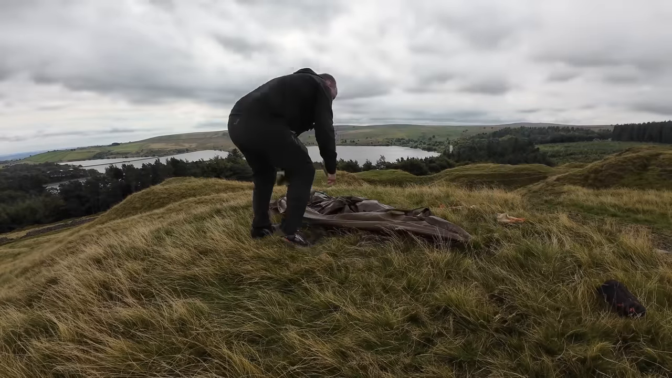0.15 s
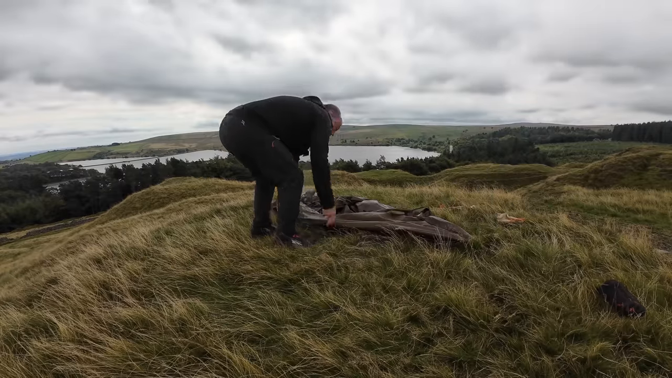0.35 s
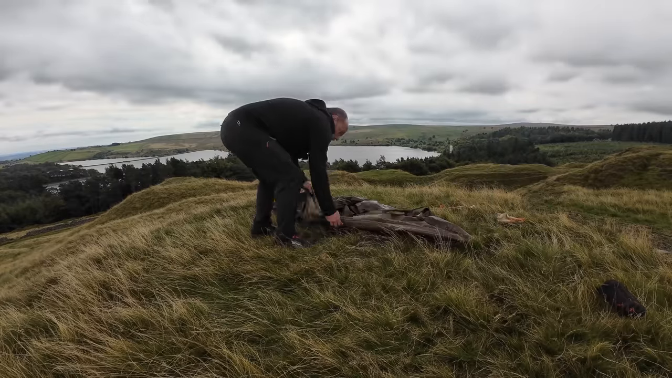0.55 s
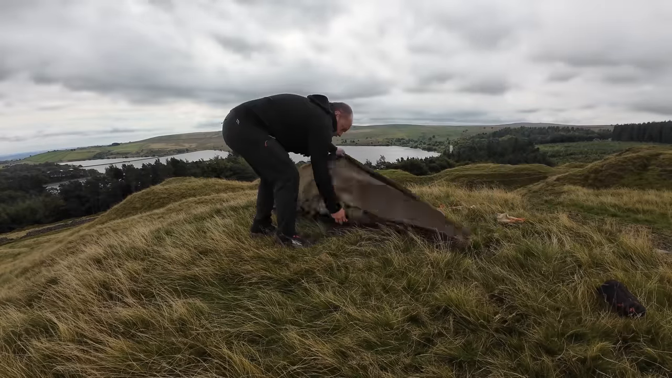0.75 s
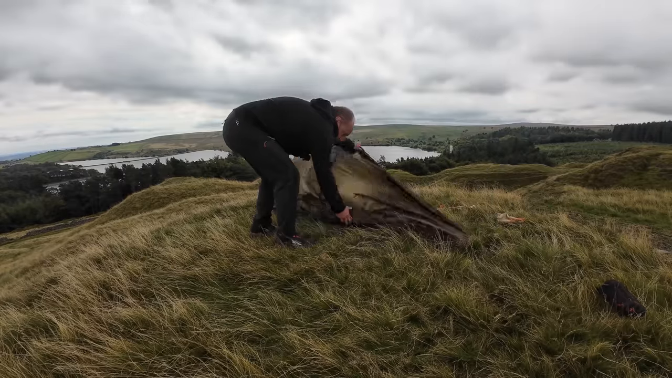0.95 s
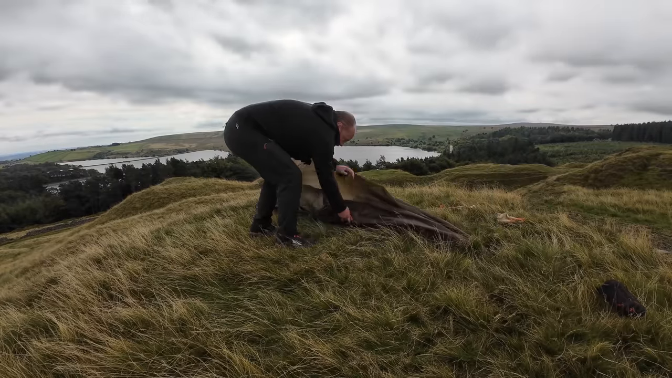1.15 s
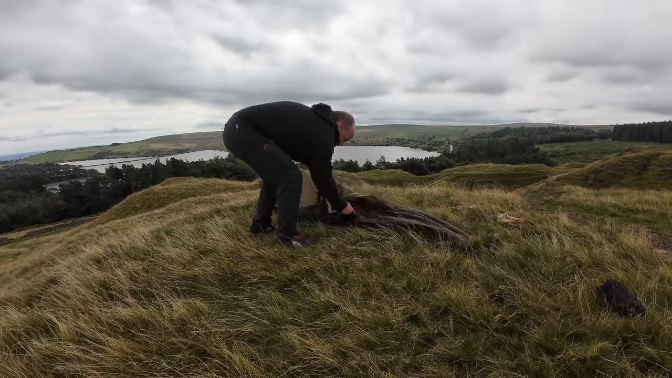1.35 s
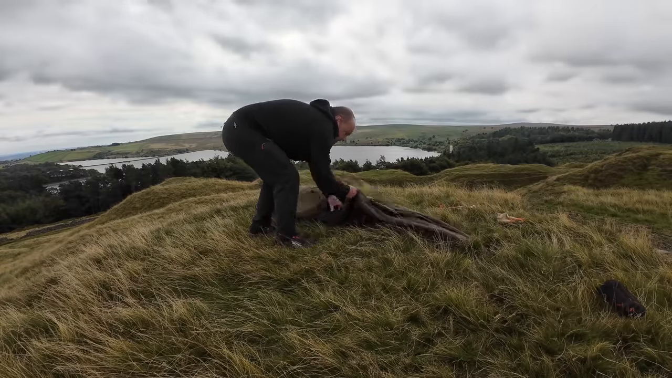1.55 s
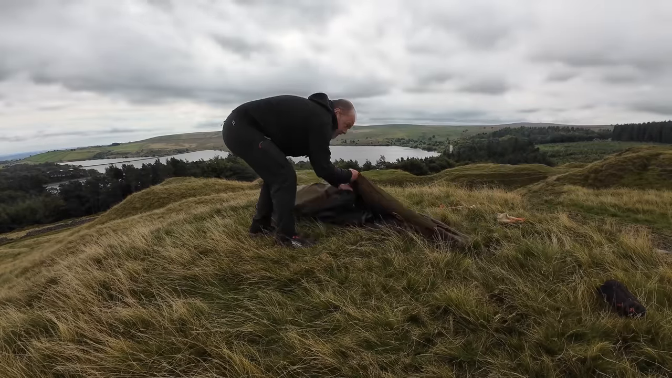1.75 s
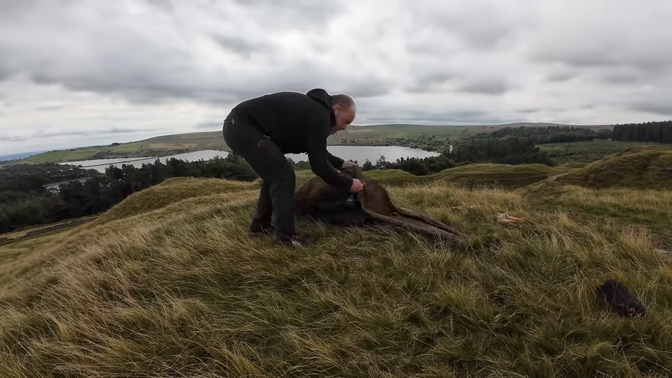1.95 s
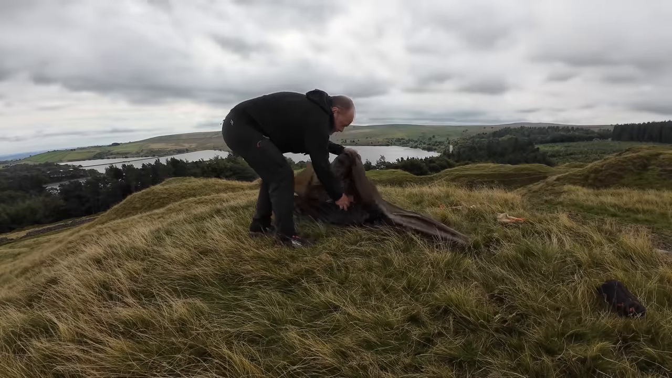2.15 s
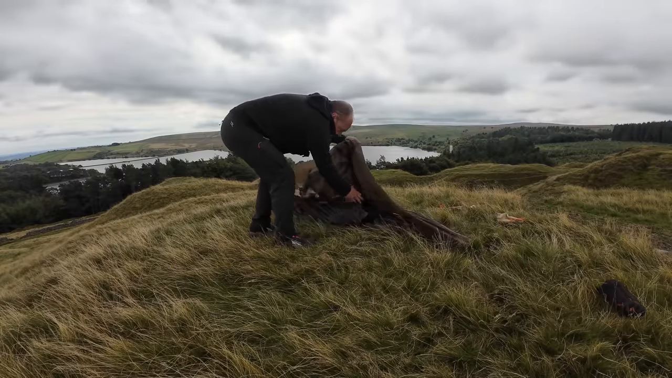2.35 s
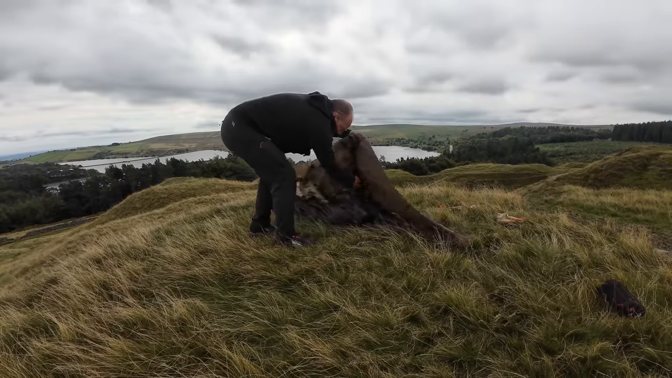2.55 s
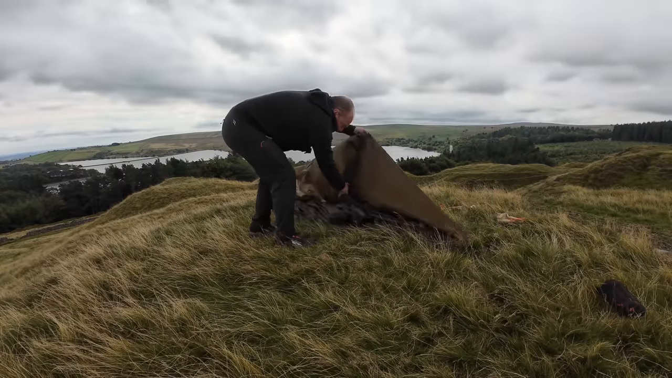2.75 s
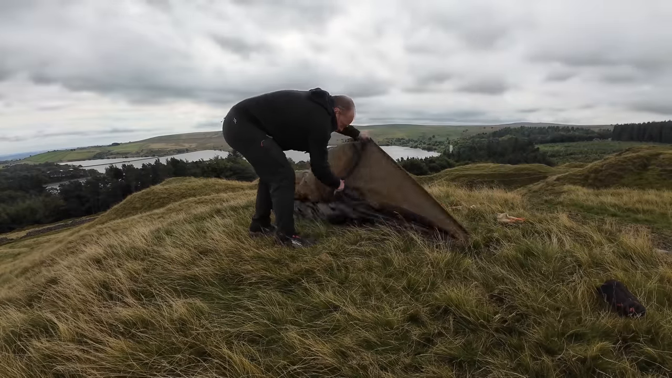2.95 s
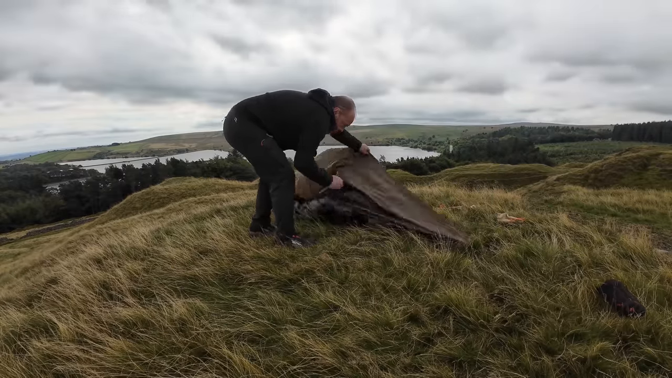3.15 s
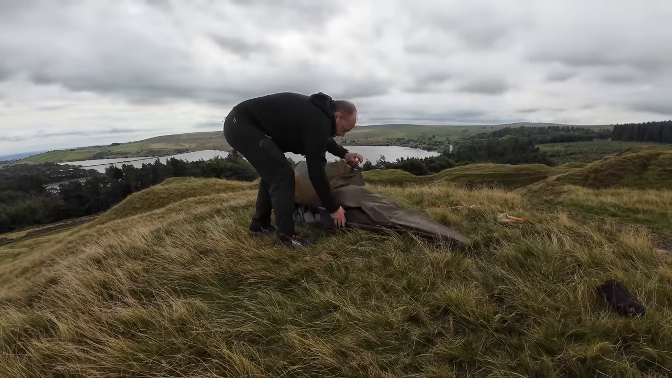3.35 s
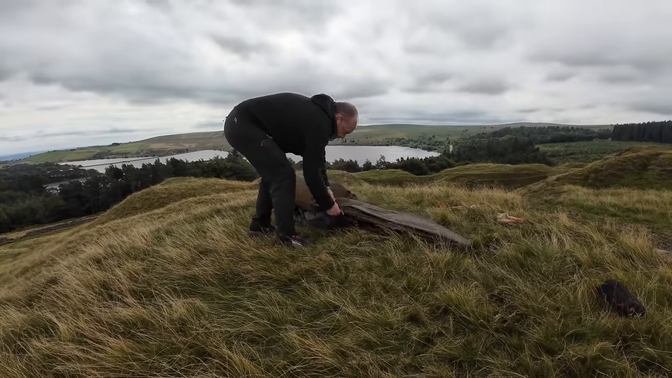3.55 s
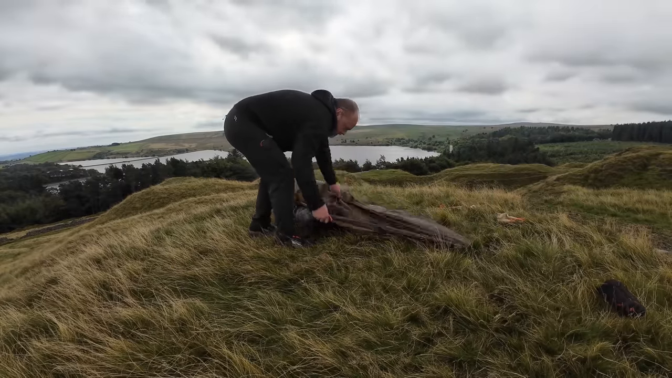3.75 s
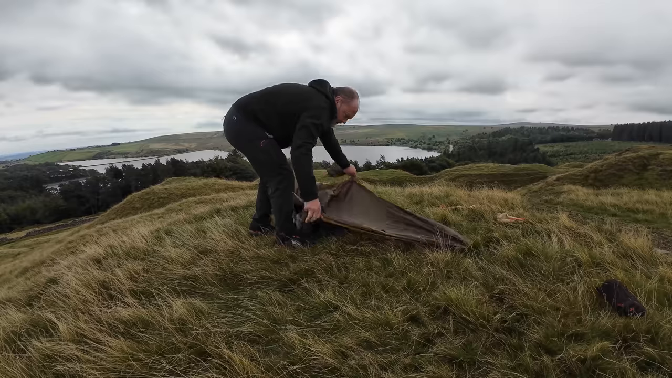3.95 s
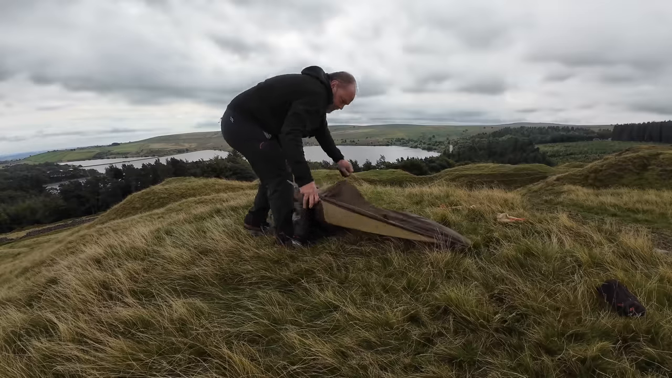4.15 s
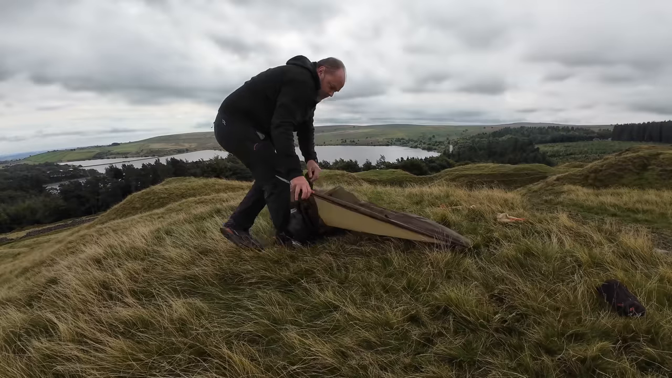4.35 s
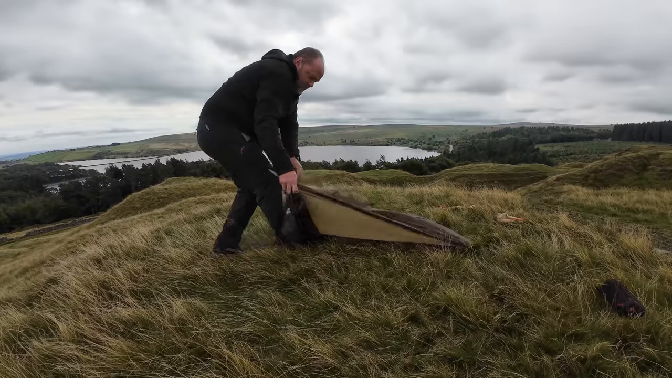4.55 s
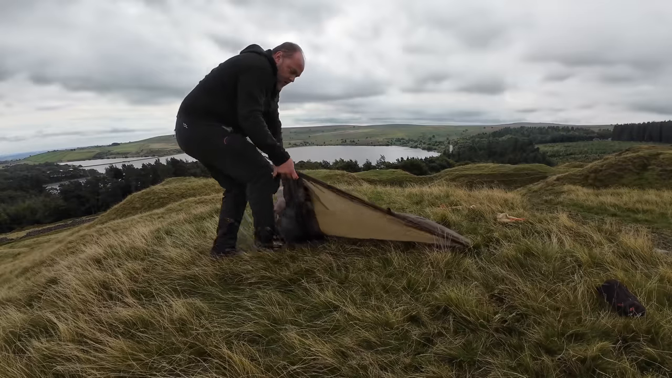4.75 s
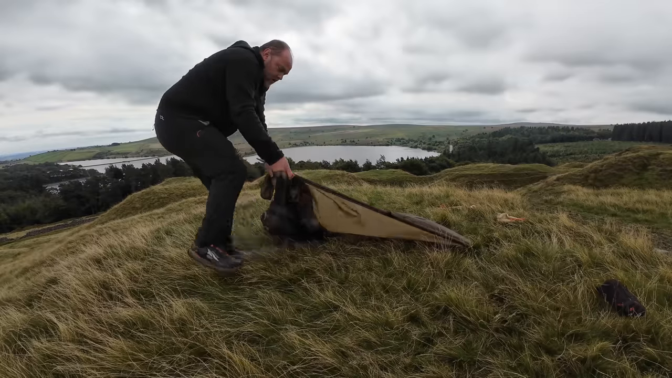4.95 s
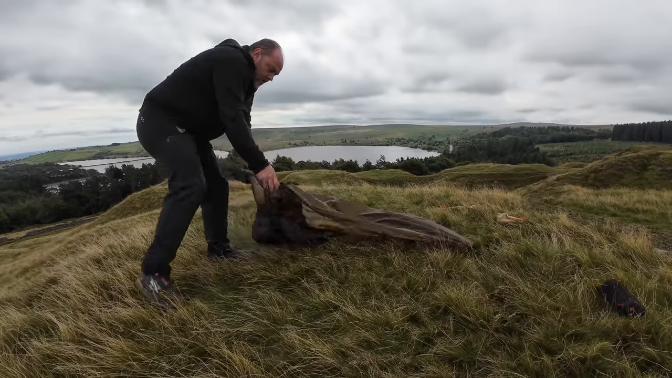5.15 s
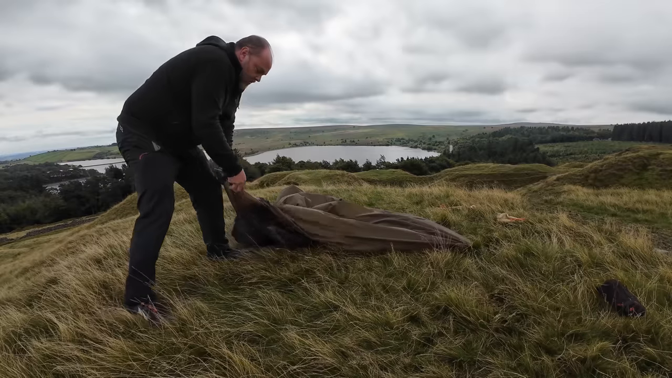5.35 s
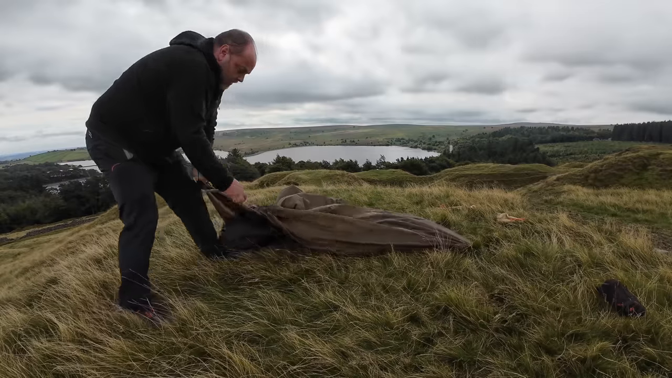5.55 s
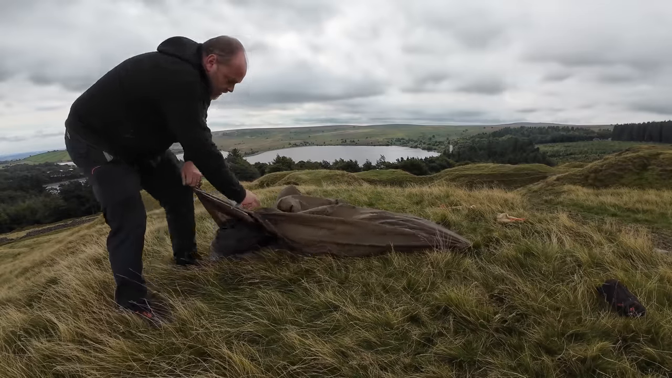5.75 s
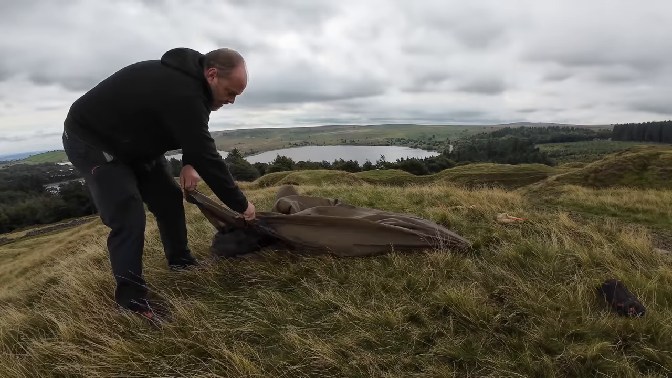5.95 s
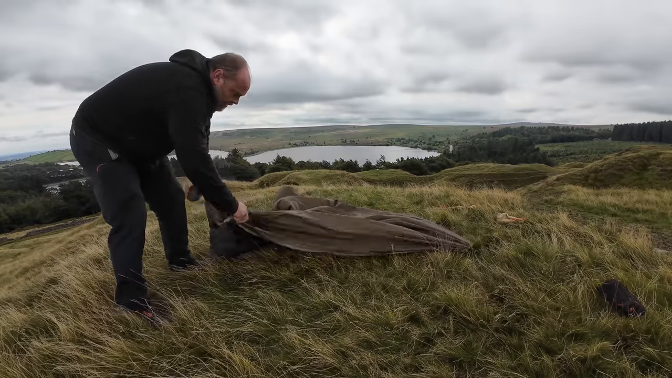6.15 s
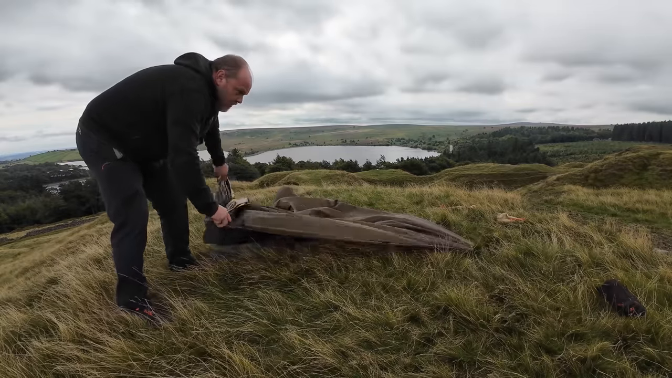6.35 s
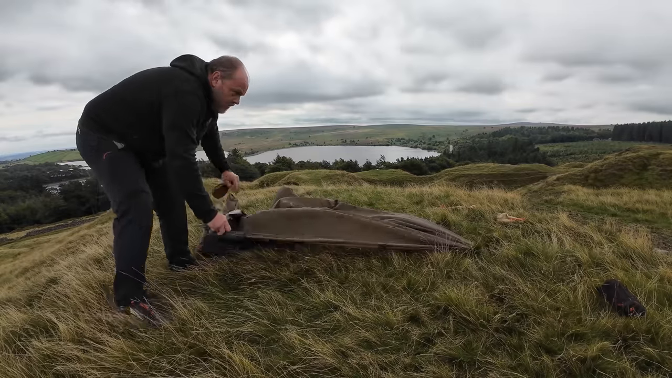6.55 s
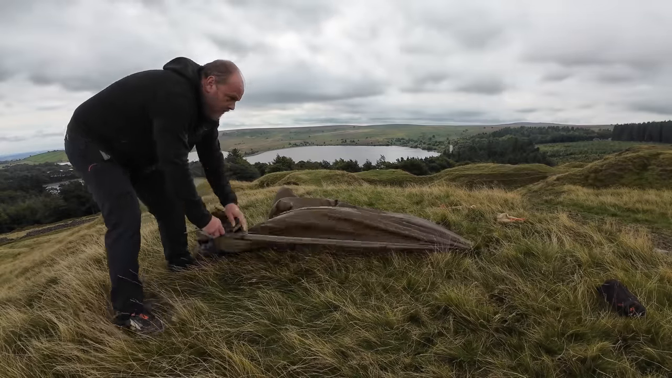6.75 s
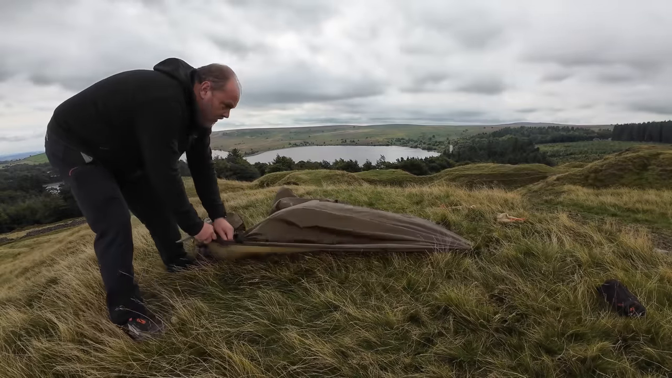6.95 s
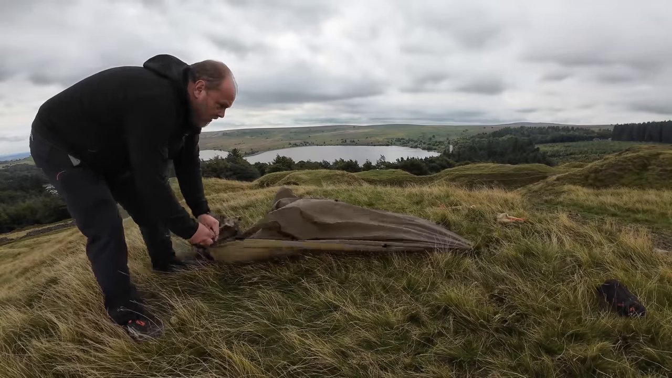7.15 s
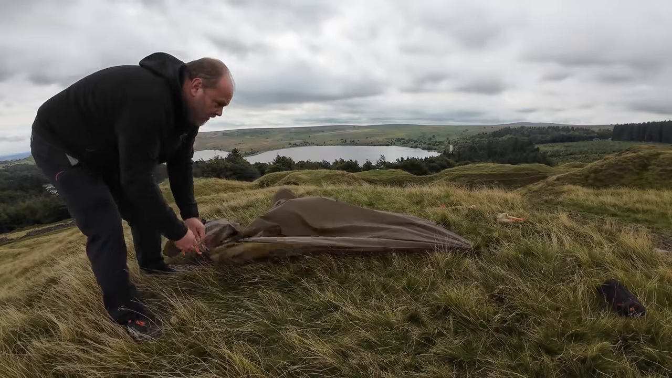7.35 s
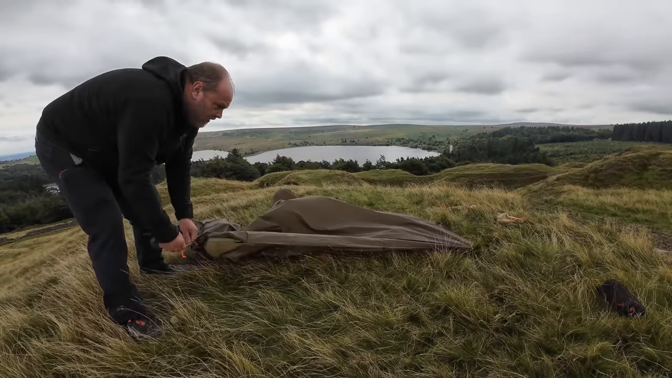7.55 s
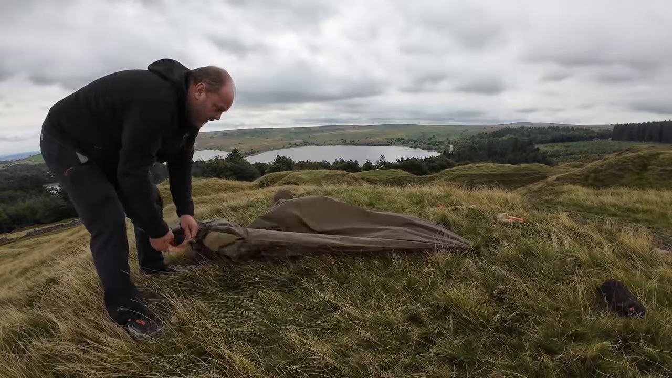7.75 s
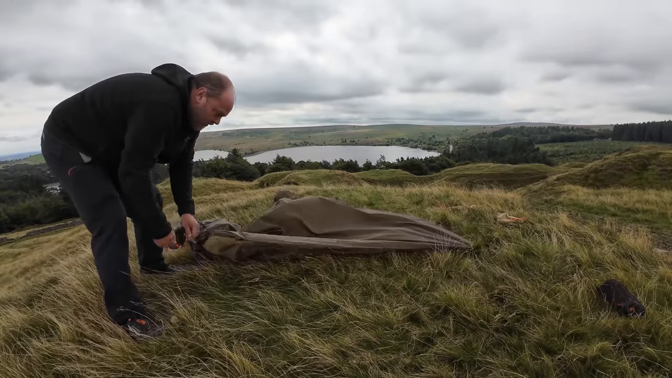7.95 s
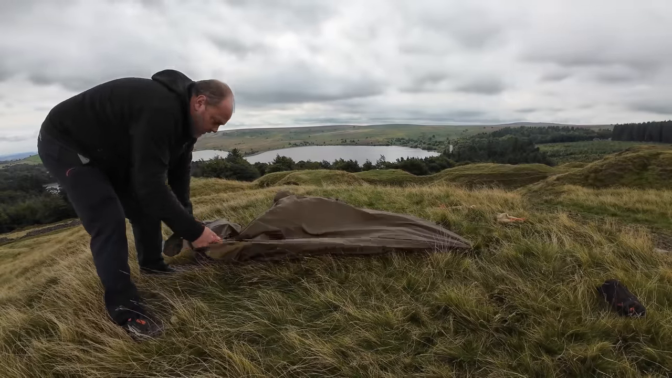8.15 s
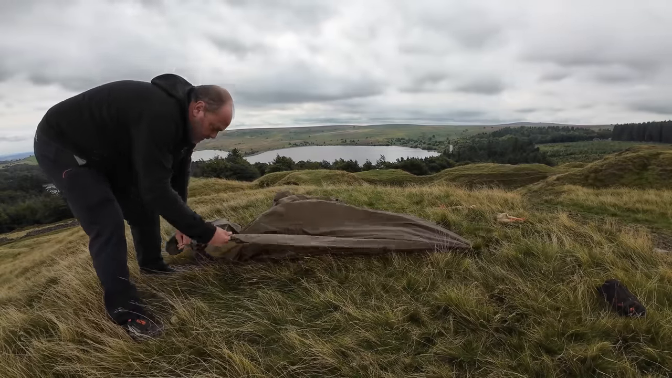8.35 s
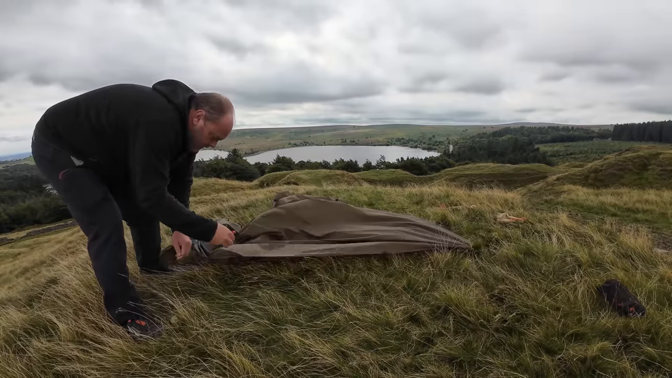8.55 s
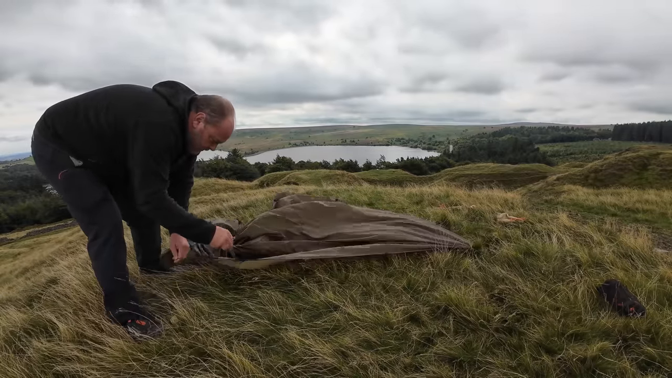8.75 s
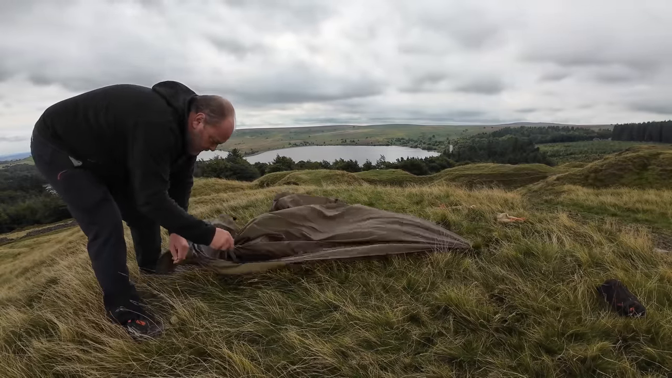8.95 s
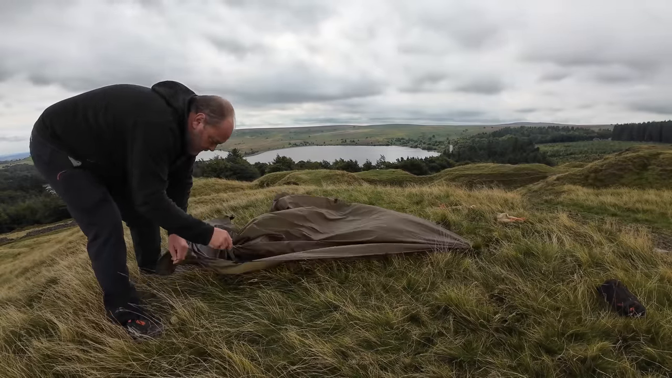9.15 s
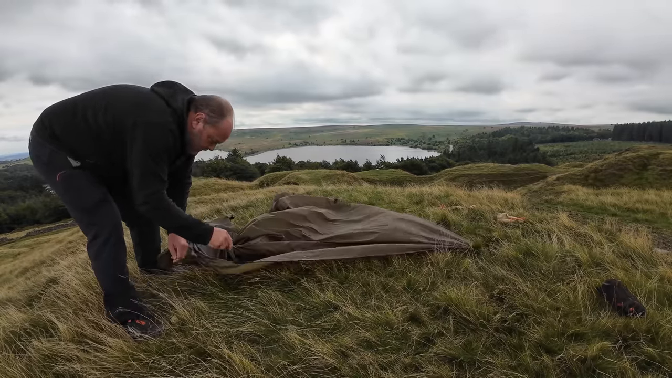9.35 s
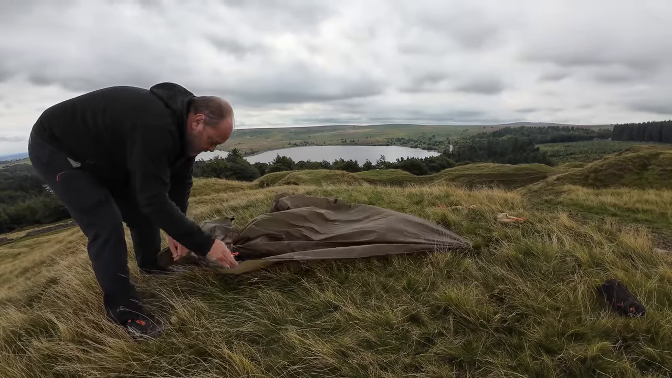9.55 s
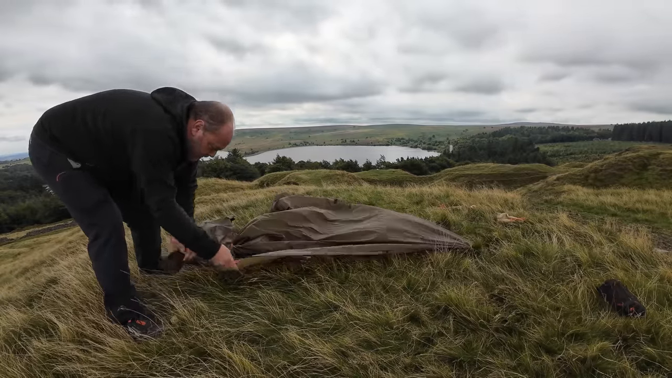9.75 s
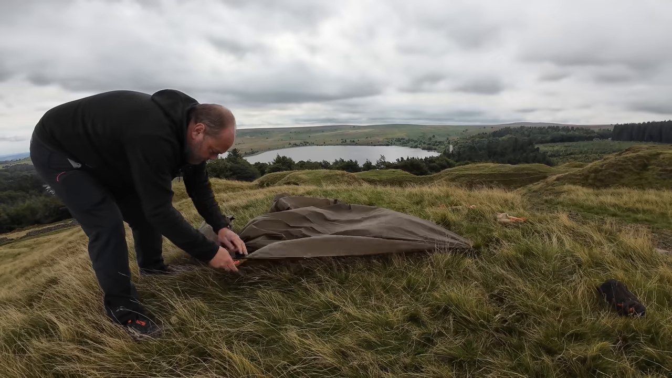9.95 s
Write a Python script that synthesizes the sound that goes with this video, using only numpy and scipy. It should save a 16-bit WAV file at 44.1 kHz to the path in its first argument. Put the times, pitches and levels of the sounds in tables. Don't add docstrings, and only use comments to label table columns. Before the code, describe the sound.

Crinkly coated fabric is handled in the open air: a quiet start, loud shakes with snapping creases and flapping panels, a long hissing drag, and a flurry of quick tugs. It calms, is jerked once more, then lies almost still. Tiny bright metal parts knock and jingle over near silence. Wind rumbles softly and unevenly on the microphone, with no reverberation.

```python
import sys
import numpy as np
from scipy import signal
from scipy.io import wavfile

SR = 44100
rng = np.random.default_rng(int(sys.argv[2]) if len(sys.argv) > 2 else 0)


def volts_from_decibels(level):
    exponent = np.asarray(level, float) / 20
    return 10 ** exponent


def persist_wave(psi):
    counts = np.round(np.clip(psi, -1, 1) * 32767).astype(np.int16)
    wavfile.write(sys.argv[1], SR, np.atleast_2d(counts).T)


N = 441000

# frequency in Hz, level in dB, t60 in seconds.
FITTING_MODES = [(2300, 3, 0.035), (3420, -14, 0.035), (3750, 1, 0.03), (4600, -6, 0.047),
                 (5250, -2, 0.034), (5770, 2, 0.061), (7550, -0.5, 0.059), (8700, 6, 0.03),
                 (10270, -4, 0.092), (11040, -5, 0.051), (12400, 1, .03), (13200, -1.5, .025),
                 (14400, 0, .025)]


def rms_one(x):
    return x / np.sqrt(np.mean(x ** 2) + 1e-20)


def in_time(rows):
    s, *columns = np.transpose(rows)
    t = np.arange(N) / SR
    return [np.interp(t, s, column) for column in columns]


def drift(rate_hz):
    hop = 40
    settle = 2000
    pole = np.exp(-2 * np.pi * hop * rate_hz / SR)
    noise = rng.standard_normal(N // hop + settle + 2)
    slow = signal.lfilter([1], [1, -2 * pole, pole * pole], noise)[settle:]
    return np.interp(np.arange(N) / hop, np.arange(len(slow)), rms_one(slow))


def ring(drive, hz, t60_s):
    radius = volts_from_decibels(-60 / (t60_s * SR))
    angle = 2 * np.pi * min(hz, 0.45 * SR) / SR
    poles = [1, -2 * radius * np.cos(angle), radius * radius]
    return signal.lfilter([0, np.sin(angle)], poles, drive + 1e-18)


def texture(spectrum, grains_per_s, spread_db, grain_share, patchy_db, patch_rate_hz,
            hump_hz=3000, hump_db=0):
    hz, level_db = np.transpose(spectrum)
    edges_hz = hz[0] * 2 ** np.arange(0, np.log2(hz[-1] / hz[0]) + 0.5, 1 / 3)
    white = rng.standard_normal((2, N))
    together = drift(patch_rate_hz)

    sizes = volts_from_decibels(spread_db * np.minimum(rng.exponential(1, N), 3.5))
    sizes = sizes * rng.choice([-1, 1], N)
    chance = grains_per_s * volts_from_decibels(5 * drift(15)) / SR
    clicks = sizes * (rng.random(N) < chance)
    centre = rng.uniform(0, len(edges_hz), N)
    scale = np.sqrt(len(edges_hz) / 3) / np.sqrt(np.mean(clicks ** 2))

    share = np.clip(grain_share, 0, 1)
    out = 0
    for k, (low, high) in enumerate(zip(edges_hz, np.minimum(edges_hz[1:], 0.45 * SR))):
        near = np.exp(-((centre - k) / 1.24) ** 2)
        drive = np.sqrt(1 - share) * white[k % 2] + np.sqrt(share) * scale * near * clicks
        band = signal.sosfilt(signal.butter(2, [low, high], "band", fs=SR, output="sos"), drive)
        colour_db = np.interp(np.log(low * high) / 2, np.log(hz), level_db)
        octaves_off = np.log2(np.sqrt(low * high) / hump_hz)
        colour_db = colour_db + hump_db * np.exp(-(octaves_off / 0.28) ** 2)
        flicker_db = patchy_db * (1.12 * together + drift(patch_rate_hz))
        out = out + volts_from_decibels(colour_db + flicker_db) * band
    return rms_one(out)


def add(track, s, sound):
    at = round(s * SR)
    track[at:at + len(sound)] += sound[:N - at]


def wind():
    # time in seconds, level in dB.
    gusts = [(0.0, -70), (0.11, -61), (0.28, -74), (0.39, -58), (0.8, -50), (0.86, -45), (0.89, -32.5),
             (0.94, -51), (0.97, -47.5), (1.08, -45.5), (1.22, -55.5), (1.48, -47.5), (1.72, -50),
             (1.81, -61), (2.0, -57.5), (2.12, -73), (2.5, -45.5), (2.56, -57), (2.78, -51.5), (2.84, -65),
             (2.95, -46.5), (3.23, -69), (3.51, -68), (3.56, -51.5), (3.68, -65), (3.87, -56),
             (3.92, -53.5), (4.29, -71.5), (4.9, -68), (4.98, -55.5), (5.76, -69.5), (5.82, -54.5),
             (5.9, -65), (6.1, -50), (6.18, -58), (6.24, -47), (6.29, -68), (6.35, -66), (6.43, -59),
             (6.52, -78.5), (6.96, -62), (7.46, -80), (7.6, -59), (7.77, -79), (7.91, -43), (8.05, -82),
             (8.63, -67.5), (9.08, -75), (9.14, -62), (9.38, -63), (9.52, -50.5), (9.69, -69), (9.8, -46),
             (9.92, -63), (9.94, -50), (10.0, -46)]
    # frequency in Hz, density in dB per Hz.
    rumble_spectrum = [(12, -68), (20, -27.5), (54, -18.5), (76, -5.5), (97, 3), (157, 0), (265, -19),
                       (338, -21.5), (500, -49), (650, -53.5), (1100, -120)]
    gust_db, = in_time(gusts)
    rumble = texture(rumble_spectrum, 40, spread_db=3, grain_share=0.1, patchy_db=1.5, patch_rate_hz=12)
    return volts_from_decibels(gust_db) * rumble


def cloth():
    # time in seconds, crinkle in dB, slide hiss in dB re crinkle,
    # billow in dB re crinkle.
    handling = [
        [(0.0, -85, -9, 1), (0.07, -61.5, -6, 5), (0.14, -57.5, -4.5, -1.5), (0.264, -81.5, -3, 10),
         (0.352, -60, -3, -11)],
        [(0.36, -47.5, -8, -0.5), (0.418, -43, -5, -5.5), (0.522, -47.5, -7, -5.5), (0.684, -35, -3, -2),
         (0.688, -38.5, -7.5, 4), (0.852, -38, -5.5, -9)],
        [(0.874, -40, -7, 6), (0.886, -35.5, -9, -0.5), (0.932, -50, -7, 1), (1.212, -47, -5, -7),
         (1.308, -59, -7, -3), (1.345, -47, -8, -5)],
        [(1.366, -36.5, -5, -7), (1.38, -42.5, 0, 1.5), (1.564, -49, 0.5, -10), (1.584, -48, 2.5, -10),
         (1.798, -52.5, -0.5, -5.5), (1.806, -40, -5, -18), (1.818, -54, -1.5, -3), (1.972, -45.5, 6.5, -5.5),
         (2.102, -63, -5, -2), (2.658, -46.5, 1, -6), (2.678, -43.5, -1.5, -11), (2.708, -59, 9, 10),
         (2.745, -42, 3.5, -22)],
        [(2.76, -43, -5, -9), (2.788, -52, -7, -7), (2.99, -48, -2.5, -6), (3.052, -35.5, -5, -10),
         (3.064, -40, -1.5, -9.5), (3.182, -57, -4.5, -2), (3.43, -50.5, -5, -9.5), (3.522, -56, -6.5, -2)],
        [(3.54, -48, -2, -5), (3.57, -41.5, -6, -8), (3.6, -40.5, 0.5, -0.5), (3.68, -45.5, 0, -3.5),
         (3.71, -40, -3.5, -8.5), (3.73, -38, 0.5, -3.5), (3.78, -37, -2.5, -12), (3.81, -35.5, 0.5, -3.5),
         (3.83, -40, 1, 4), (3.85, -37.5, -1.5, 4.5), (3.91, -40, -3, -5.5), (4.03, -50, -10.5, -8.5),
         (4.36, -56.5, -3, -6), (4.66, -61, -4.5, -3), (4.79, -55, -4.5, -3.5), (4.91, -61.5, -3, -3.5),
         (4.96, -51.5, -3.5, -7), (5.34, -59.5, -3, -1.5), (5.58, -55.5, -1, -4.5)],
        [(5.59, -61.5, -5.5, 0), (5.716, -67.5, -4, 0), (5.818, -58, -2, 0.5), (5.908, -65, -4, -1),
         (5.91, -64, -5, 3)],
        [(5.922, -53.5, -2.5, -1), (6.03, -54.5, -2.5, -8), (6.106, -41.5, 2, -10), (6.21, -37.5, -1, -8)],
        [(6.242, -41, -1.5, -4), (6.268, -45.5, -6, -10), (6.316, -60, -6, -3), (6.404, -53, -5.5, -5),
         (6.53, -62, -5, -2.5), (6.886, -64.5, 0, -1.5), (6.9, -55, -2, -2), (6.988, -70, -1, -3.5),
         (7.146, -65.5, -4.5, 0), (7.2, -69.5, -4, -3)],
    ]
    resting = [
        [(7.24, -69.5, -5, 3.5), (7.26, -73, 1, 2), (7.28, -62.5, -10, -4)],
        [(7.38, -81, -5, 2.5), (7.442, -80, -6, -12), (7.48, -77, -7, 5.5)],
        [(7.65, -88.5, -2, 7.5), (7.934, -67, -16, -6), (8.07, -88.5, 1, 2.5)],
        [(8.18, -79.5, -8, 0.5), (8.268, -74, -8, -2), (8.375, -87, -1, 7)],
        [(8.47, -83.5, -2.5, 3), (8.832, -68.5, -6.5, -3), (8.92, -79, -4.5, 0), (9.402, -79, -6, 4.5),
         (9.492, -85, 6.5, 13), (9.582, -88, -4.5, 6.5), (10.0, -63, -3, 1)],
    ]
    # time in seconds, frequency in Hz.
    crease_pitch = [(0.0, 2790), (0.28, 2440), (0.68, 2730), (0.86, 2370), (1.44, 2550), (1.9, 3680),
                    (2.11, 3570), (2.28, 2680), (2.55, 2930), (2.99, 2550), (4.53, 3330), (5.63, 3070),
                    (5.73, 2800), (6.46, 2700), (7.2, 2830)]
    # frequency in Hz, density in dB per Hz.
    crinkle_spectrum = [(350, -33), (600, -6), (887, -8), (1130, -0.5), (1410, -2.5), (2040, 2.5),
                        (2750, -3.5), (3170, -0.5), (3980, -1.5), (4550, -7), (6120, -6.5), (7000, -15.5),
                        (9100, -32), (15400, -120)]
    slide_spectrum = [(2350, -23), (4000, -12), (4560, -8), (6130, -1.5), (11200, -3), (14500, -2.5),
                      (15100, -8), (15600, -5.5)]
    billow_spectrum = [(88, -34), (150, -11.5), (297, 0.5), (372, -10), (415, 3), (542, -8), (589, -8.5),
                       (1100, -17), (1430, -51.5), (2420, -120)]

    crinkle_db, slide_db, billow_db = in_time(sum(handling + resting, []))
    crease_hz, = in_time(crease_pitch)
    crinkle = texture(crinkle_spectrum, 600, spread_db=4.5, grain_share=0.49, patchy_db=1.2,
                      patch_rate_hz=17, hump_hz=crease_hz, hump_db=6)
    slide = texture(slide_spectrum, 1500, spread_db=4.2, grain_share=0.3, patchy_db=1.1, patch_rate_hz=22)
    billow = texture(billow_spectrum, 150, spread_db=0, grain_share=0.36, patchy_db=3, patch_rate_hz=18)
    stir_db = -82
    level = volts_from_decibels(crinkle_db - 0.56) + volts_from_decibels(stir_db)
    return level * (crinkle + volts_from_decibels(slide_db) * slide + volts_from_decibels(billow_db) * billow)


def snaps():
    # start in seconds, peak in dB, pitch in Hz, crack in dB re ring.
    creases = [(0.3587, -44, 2360, -24), (0.4994, -24, 2620, -26), (0.5909, -17.5, 2300, -9),
               (0.6496, -13, 3000, -19), (0.6788, -17, 3340, -7), (0.7063, -16.5, 1120, -20),
               (0.8649, -10, 2170, -20), (1.061, -31, 2550, -22), (1.1456, -27, 2420, -1),
               (1.1743, -25, 2530, -4), (1.3624, -19, 2120, -16), (1.5864, -22.5, 6350, -13),
               (1.6122, -24, 3600, -16), (1.8043, -30, 3140, -19), (1.9525, -24, 3900, -7),
               (1.991, -19.5, 3750, -14), (2.142, -35.5, 3260, -3), (2.161, -45, 2200, 8),
               (2.2705, -42, 1170, -13), (2.2994, -41, 2390, 3), (2.484, -33, 6560, -13),
               (2.5151, -22.5, 3340, -8.5), (2.5775, -29, 5250, 0), (2.6745, -21, 3150, -15),
               (2.7368, -22.5, 4130, -6), (2.7422, -33, 1850, 6), (2.8572, -27, 3220, -19),
               (3.0265, -19, 2770, -13), (3.0469, -14, 2760, -22), (3.0988, -27, 3060, -14),
               (3.5638, -34, 3040, -15), (3.5744, -27, 3180, -16), (3.781, -18, 3900, -16),
               (4.1043, -48, 3030, -27.5), (4.769, -31, 2780, -19), (4.9745, -31, 3840, -23),
               (5.0144, -28, 3040, -23), (5.0662, -29.5, 3670, -15), (5.553, -36, 3440, -24),
               (5.9184, -41, 3220, -11), (6.0642, -23, 2820, -13), (6.225, -19.5, 1140, -14),
               (6.4147, -35, 1700, -20), (6.9052, -39.5, 4030, -10), (8.2584, -45, 2130, -23),
               (8.7939, -52, 3470, -20), (8.8139, -49, 1900, -22), (8.8354, -43, 2080, -26),
               (9.0977, -48, 5040, -23), (9.9335, -51, 3320, -13)]
    out = np.zeros(N)
    t = np.arange(1500) / SR
    decay = np.exp(-t / 0.00024) + volts_from_decibels(-21.5) * np.exp(-t / 0.0037)
    for s, peak_db, hz, crack_db in creases:
        jolt = rng.standard_normal(len(t)) * decay
        body = ring(jolt, hz, 12.3 / hz) + volts_from_decibels(-1.5) * ring(jolt, 2.06 * hz, 3.3 / hz)
        crack = ring(np.diff(jolt, prepend=0), 6300, 0.00036)
        snap = body / np.abs(body).max() + volts_from_decibels(crack_db + 7.5) * crack / np.abs(crack).max()
        add(out, s, volts_from_decibels(peak_db - 2.5) * snap)
    return out


def flaps():
    # start in seconds, peak in dB, pitch in Hz, t60 in seconds.
    panels = [(0.704, -19.5, 310, 0.019), (0.733, -21.5, 410, 0.022), (0.862, -11.5, 169, 0.0067),
              (0.876, -39, 151, 0.034), (0.889, -28, 193, 0.0088), (1.061, -35, 151, 0.025),
              (3.026, -34, 249, 0.057), (3.723, -32.5, 470, 0.038), (3.793, -28, 296, 0.031),
              (3.802, -28, 460, 0.033), (3.844, -26.5, 360, 0.025), (3.856, -23, 245, 0.026),
              (6.222, -12, 364, 0.011), (6.414, -32, 174, 0.018), (8.245, -53.5, 330, 0.023),
              (8.609, -58, 277, 0.018), (8.808, -56, 345, 0.046)]
    out = np.zeros(N)
    t = np.arange(3000) / SR
    push = -np.exp(-((t - 0.003) / 0.0003) ** 2)
    for s, peak_db, hz, t60_s in panels:
        thump = ring(push, hz, t60_s)
        add(out, s, volts_from_decibels(peak_db) * thump / np.abs(thump).max())
    return out


def metal(drive, low_hz, high_hz, high_db, ring_share, luck, dry_db):
    hz, level_db, t60_s = np.transpose(FITTING_MODES)
    near_low = volts_from_decibels(-35 * np.log2(hz / low_hz) ** 2)
    near_high = volts_from_decibels(high_db - 60 * np.log2(hz / high_hz) ** 2)
    gains = (near_low + near_high) * volts_from_decibels(level_db + 2.5 * luck[:len(hz)])
    share = max(ring_share, 0.05)
    modes = sum(g * ring(drive, f, share * t60) for g, f, t60 in zip(gains, hz, t60_s))
    bare = ring(drive, low_hz, 8.7 / low_hz) + volts_from_decibels(high_db) * ring(drive, high_hz, 7.5 / high_hz)
    return modes + volts_from_decibels(dry_db) * bare


def fittings():
    # start in seconds, peak in dB, low part in Hz, high part in Hz,
    # high part in dB re low, ring as share of t60.
    ticks = [(7.294, -43.5, 5840, 8700, 11, .5), (7.3412, -44.5, 5840, 10300, 18, 1),
             (7.5465, -39, 3650, 12700, 14, 0.18), (7.5665, -34.5, 3000, 13200, -4, 0.17),
             (7.5772, -26, 3650, 9600, 3, 0.37), (8.1135, -54, 8700, 14000, -1, 0.12),
             (8.124, -55, 7500, 11940, 1.5, .15), (8.2894, -62, 9000, 14400, 5, .12),
             (8.3864, -45, 6050, 11400, 3, .12), (8.4222, -29.5, 5200, 10800, -8, 0.2),
             (8.4796, -57, 7900, 14600, 11, .12)]
    # start in seconds, level in dB, low part in Hz, high part in Hz,
    # high part in dB re low, length in seconds.
    rattles = [
        (7.274, -62.5, 5800, 8100, 16, 0.043),
        (7.428, -70, 3620, 11000, 1, .015),
        (7.498, -43, 3600, 9500, 23, 0.015),
        (7.536, -61, 3600, 12800, 9, 0.022),
        (7.562, -44, 3000, 12800, 18, 0.023),
        (7.59, -55.5, 3630, 8850, 7, 0.04),
        (8.085, -79, 6000, 7560, 1, 0.044),
        (8.151, -65, 3000, 11900, -3, .015),
        (8.393, -52, 5540, 7900, -8, 0.024),
        (8.413, -61.5, 4530, 10000, -15, 0.033),
    ]
    out = np.zeros(N)
    t = np.arange(5000) / SR
    for s, peak_db, low_hz, high_hz, high_db, share in ticks:
        luck = rng.standard_normal(len(FITTING_MODES))
        blow = rng.standard_normal(len(t)) * np.exp(-t / 0.0008)
        knock = metal(blow, low_hz, high_hz, high_db, share, luck, dry_db=0)
        add(out, s, volts_from_decibels(peak_db + 2.5) * knock / np.abs(knock).max())
    for s, level_db, low_hz, high_hz, high_db, length_s in rattles:
        luck = rng.standard_normal(len(t))
        shake = np.sin(np.pi * np.clip(t / length_s, 0, 1)) ** 0.57
        contacts = rng.standard_normal(len(t)) * luck * shake
        chatter = metal(contacts, low_hz, high_hz, high_db, 0.33, luck, dry_db=11)
        add(out, s, volts_from_decibels(level_db) * rms_one(chatter) * np.sqrt(length_s / t[-1]))
    return signal.sosfilt(signal.butter(4, 2170, "high", fs=SR, output="sos"), out)


def scene():
    port_cut = signal.butter(3, 115, "high", fs=SR, output="sos")
    knocks = signal.sosfilt(port_cut, snaps() + flaps())
    return (wind() + cloth() + knocks + fittings())[None]


def low_pass(x):
    return signal.sosfilt(signal.butter(12, 15840, fs=SR, output="sos"), x)


def record(dry):
    top_cut = signal.cheby2(12, 60, 16200, fs=SR, output="sos")
    mix = signal.sosfilt(top_cut, dry)
    return low_pass(mix)


dry = scene()
out = record(dry)
persist_wave(out)
```